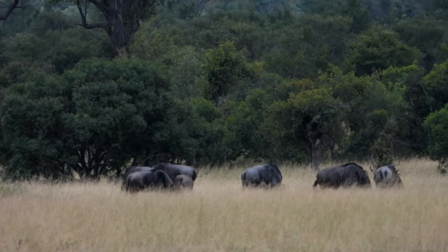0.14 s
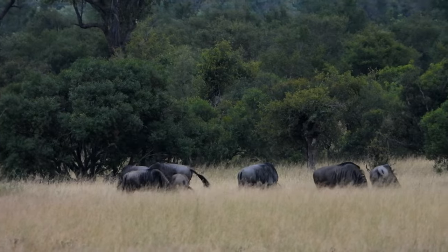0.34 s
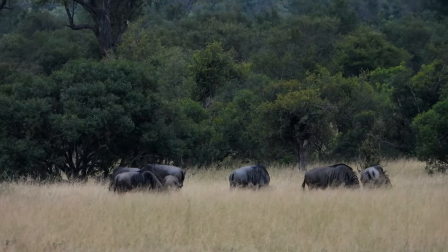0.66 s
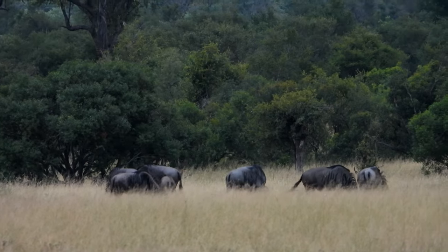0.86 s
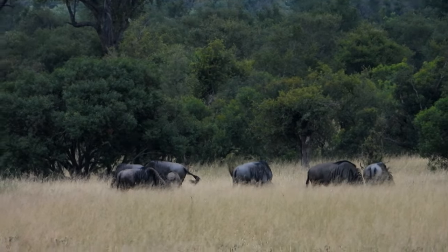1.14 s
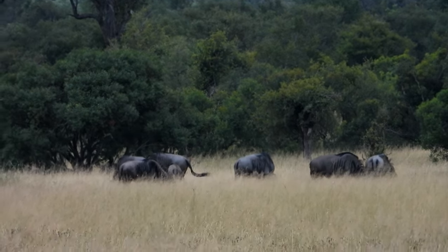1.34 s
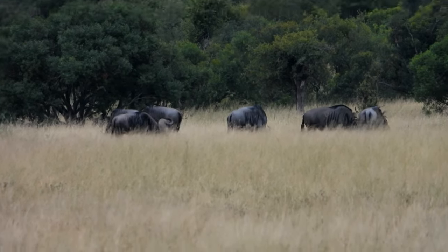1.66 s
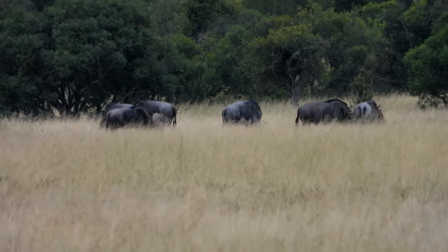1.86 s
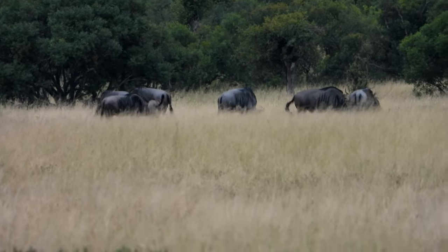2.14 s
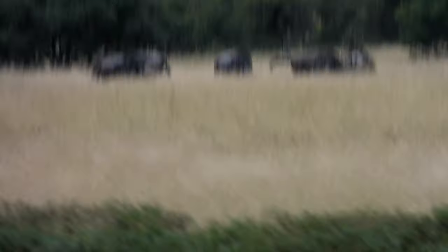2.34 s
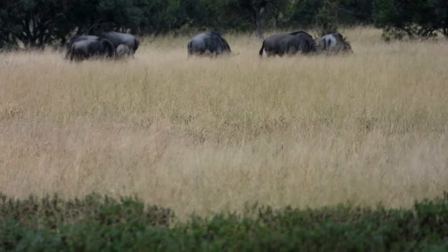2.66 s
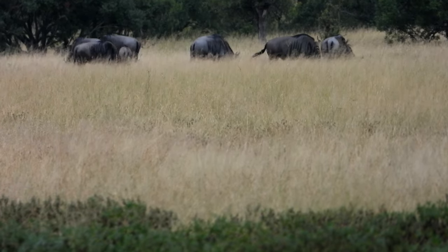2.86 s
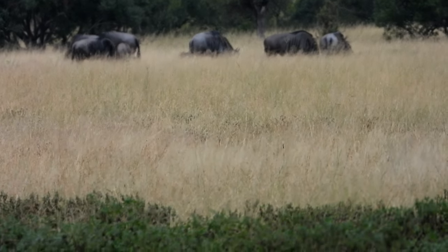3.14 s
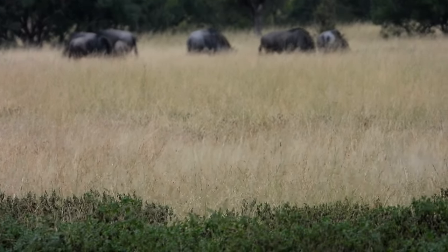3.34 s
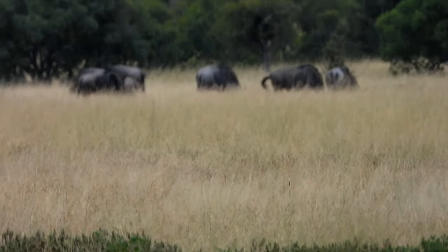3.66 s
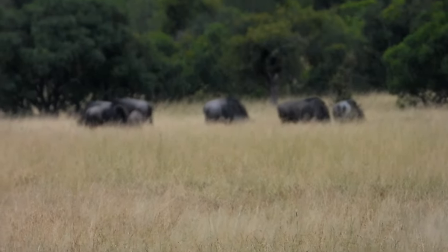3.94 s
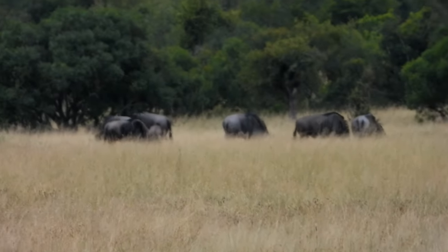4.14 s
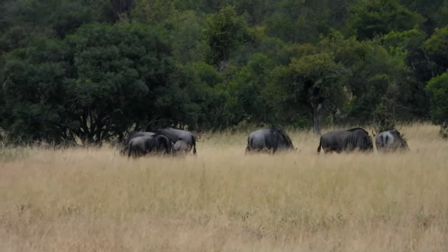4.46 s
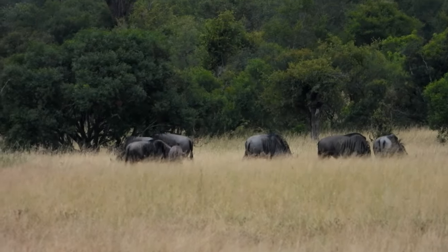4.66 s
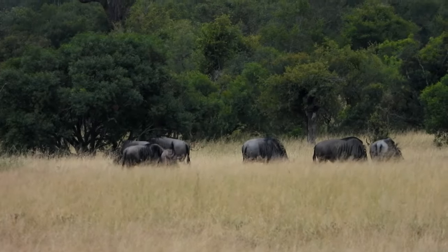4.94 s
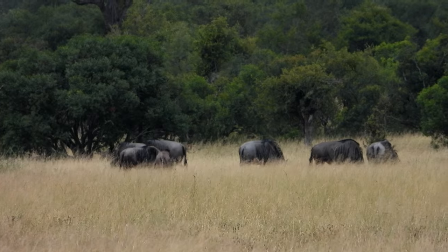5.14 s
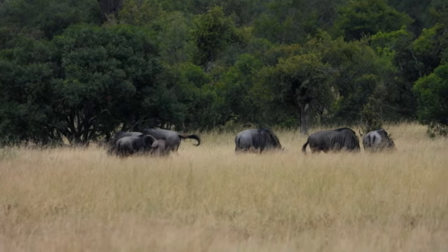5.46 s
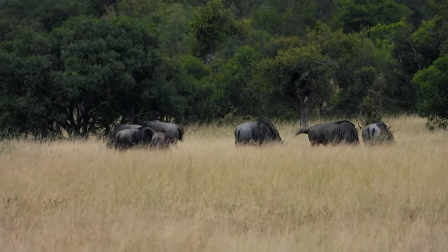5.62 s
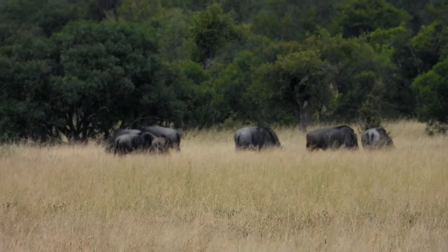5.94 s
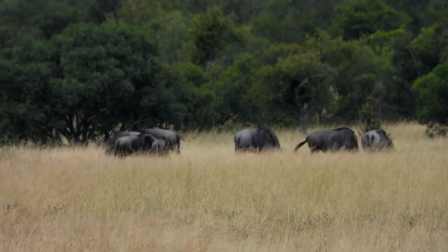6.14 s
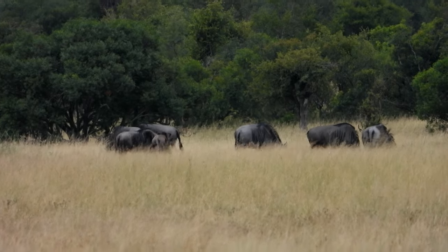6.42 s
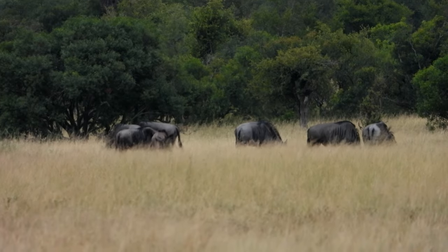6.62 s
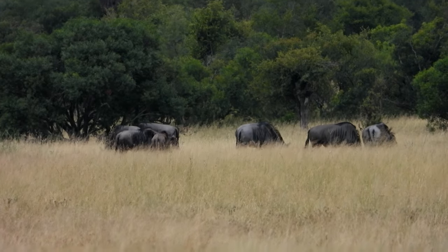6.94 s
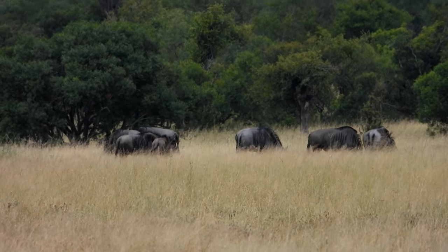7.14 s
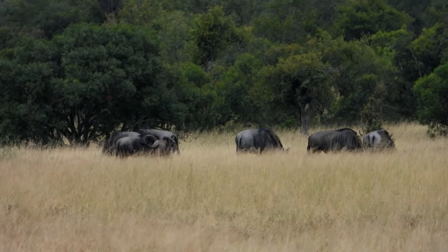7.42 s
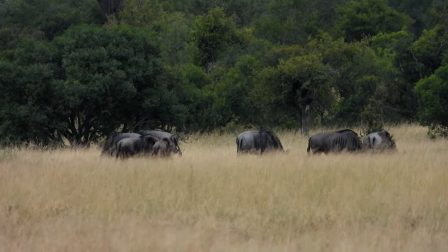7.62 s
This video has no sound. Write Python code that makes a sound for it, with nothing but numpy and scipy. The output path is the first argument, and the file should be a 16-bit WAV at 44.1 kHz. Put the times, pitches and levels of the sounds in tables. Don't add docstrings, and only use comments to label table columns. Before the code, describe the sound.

Close raspy bird squawks and scooping whistles repeat in alternating phrases, echoing off trees, while distant birds trill and an idling engine hums low.

```python
import sys
import numpy as np
from scipy import signal
from scipy.fft import rfft, irfft, next_fast_len
from scipy.io import wavfile
from scipy.ndimage import uniform_filter1d

SR = 44100
rng = np.random.default_rng(int(sys.argv[2]) if len(sys.argv) > 2 else 0)


def dump(signal):
    limited = np.clip(np.atleast_2d(signal).T, -1, 1)
    pcm = np.round(limited * 32767).astype(np.int16)
    wavfile.write(sys.argv[1], SR, pcm)


def volts_from_db(level):
    exponent = np.asarray(level, float) / 20
    return 10 ** exponent


N = 343539


def evened(x):
    return x / np.sqrt(np.mean(x ** 2) + 1e-20)


def read(points, hz):
    f, value = np.transpose(points)
    return np.interp(np.log(hz + 1), np.log(f + 1), value)


def add(mix, s, sound):
    part = mix[round(s * SR):][:len(sound)]
    part += sound[:len(part)]


def wander(count, hz):
    size = max(int(SR / hz), 2)
    noise = rng.standard_normal(count + 4 * size)
    smooth = uniform_filter1d(uniform_filter1d(noise, size), size)
    return evened(smooth[2 * size:][:count])


def resonate(x, hz, width):
    turn = np.exp(2j * np.pi * np.cumsum(hz * np.ones(len(x))) / SR)
    r = np.exp(-np.pi * width / SR)
    return 2 * (turn * signal.lfilter([1 - r], [1, -r], x / turn)).real


def swell(count, rise, fall):
    u = np.linspace(0, 1, count)
    return np.sin(np.pi / 2 * np.clip(np.minimum(u / rise, (1 - u) / fall), 0, 1)) ** 2


def shaped(rows, shape):
    return [(s, length, shape[0] * hz, hz, shape[1] * hz, db) for s, length, hz, db in rows]


def slid(rows):
    return [(s, length, hz0, (hz0 + hz1) / 2, hz1, db) for s, length, hz0, hz1, db in rows]


def note(row, strength, count, rise=.25, fall=.4, scoop=0., flutter_db=1.5, fade_db=0., flutter_hz=148.7):
    s, length, start, middle, end, db = row
    u = np.linspace(0, 1, int(length * SR))
    hz = start * (1 - u) * (1 - 2 * u) + 4 * middle * u * (1 - u) + end * u * (2 * u - 1)
    hz = hz * (1 - scoop * np.exp(-u / 0.0639))
    hz = hz * (1 + 0.0321 * u ** 3 * wander(len(u), 440))
    turns = np.cumsum(hz) / SR
    tone = 0
    for k in range(1, count + 1):
        partial_db = strength(k, k * hz) + fade_db * (k > 1) * u
        tone = tone + volts_from_db(partial_db) * np.sin(2 * np.pi * k * turns)
    level_db = db + flutter_db * wander(len(u), flutter_hz)
    return s, volts_from_db(level_db) * tone * swell(len(u), rise, fall)


def far_note(row):
    return note(row, lambda k, hz: 0, count=1, rise=0.13, fall=0.24, flutter_db=2.8, flutter_hz=240)


# (frequency [Hz], density [dB per Hz])
AIR_COLOUR = [(20, -22), (45, -8), (100, -3), (160, -5.5), (310, -22.5), (680, -20), (900, -12),
              (1500, -18.5), (2600, -24.5), (4600, -28), (5000, -36.5), (5600, -31.5), (7500, -40),
              (15500, -42)]
# (frequency [Hz], correlation [0..1])
LEFT_RIGHT_LIKENESS = [(60, .992), (200, .99), (550, .96), (1650, .93), (4970, .62), (8000, .45),
                       (15000, .45)]


def air():
    frames, hz = N // 256 + 5, np.fft.rfftfreq(1024, 1 / SR)
    a, b, c, d, patches = rng.standard_normal((frames, 513, 5)).T
    patches = evened(uniform_filter1d(uniform_filter1d(patches, 9, 0), 8, 1))
    same = np.clip(read(LEFT_RIGHT_LIKENESS, hz), -1, 1)[:, None]
    left = a + 1j * b
    right = same * left + np.sqrt(1 - same ** 2) * (c + 1j * d)
    spectra = np.array([left, right]) * volts_from_db(read(AIR_COLOUR, hz)[:, None] + 2.09 * patches)
    return volts_from_db(-33) * evened(signal.istft(spectra, nperseg=1024, noverlap=768)[1][:, :N])


# (order [multiple of firing rate], level [dB])
ENGINE_ORDERS = [(2, -51.5), (3, -44), (4, -37), (6, -36.5), (7, -42), (8, -62.5)]


def engine():
    firing_hz = 25.693
    turns = np.cumsum(firing_hz * (1 + 0.011863 * wander(N, 3.009))) / SR
    hum = np.zeros(N)
    for k, db in ENGINE_ORDERS:
        hum += volts_from_db(db - 0.5 + 2.46 * wander(N, 9.43)) * np.sin(2 * np.pi * (k * turns + rng.random()))
    return hum


def trill(s0, s1, hz, fall, rate, db):
    t = np.arange(int((s1 - s0) * SR)) / SR
    beat = (rate * t + .08 * wander(len(t), 30)) % 1
    turns = np.cumsum(hz + fall * (.5 - beat) + 60 * wander(len(t), 20)) / SR
    pulse = np.sin(np.pi * beat) ** 2.23 * volts_from_db(db + 1.97 * wander(len(t), 40))
    return s0, pulse * np.sin(2 * np.pi * turns) * signal.windows.tukey(len(t), .3)


# (pitch [Hz], fall in each note [Hz], rate [notes/s])
SINGERS = [(6650, 1300, 67), (6300, 800, 54), (4570, 900, 41)]
# (start [s], end [s], level [dB])
FAST_TRILLS = [
    (0, .15, -45),
    (.2, .6, -48),
    (.88, 1.7, -45),
    (5.78, 6.2, -46),
    (6.95, 7.72, -45),
]
# (start [s], end [s], level [dB])
EVEN_TRILLS = [
    (.3, .88, -42),
    (1.93, 2.36, -42),
    (2.68, 2.95, -52),
    (4.72, 5.08, -43),
    (6.13, 6.85, -43),
]
# (start [s], end [s], level [dB])
LOW_TRILLS = [
    (0, .25, -45),
    (.55, 1.2, -48),
    (6.05, 6.95, -52),
    (7.15, 7.5, -50),
]


def trills(out):
    for rows, singer in zip((FAST_TRILLS, EVEN_TRILLS, LOW_TRILLS), SINGERS):
        for s0, s1, db in rows:
            add(out, *trill(s0, s1, *singer, db))


# (time [s], pitch [Hz], level [dB])
TUMBLING_WHISTLES = [
    [(0.0, 1852, -34), (0.008, 1996, -31), (0.016, 1992, -29), (0.022, 1839, -34), (0.034, 1253, -28),
     (0.04, 1137, -29), (0.046, 1124, -36)],
    [(0.168, 1555, -41), (0.172, 1533, -33), (0.182, 1660, -31), (0.188, 1625, -30), (0.198, 1212, -28),
     (0.21, 1081, -30), (0.216, 1039, -38)],
    [(0.686, 1479, -37), (0.69, 1526, -34), (0.702, 2163, -31), (0.712, 2161, -24), (0.72, 1921, -31),
     (0.732, 1311, -24), (0.742, 1067, -28), (0.75, 952, -48)],
    [(1.297, 1519, -36), (1.303, 1625, -19), (1.309, 1708, -16), (1.319, 2180, -27), (1.325, 2144, -22),
     (1.335, 1902, -28), (1.347, 1342, -17), (1.362, 1147, -33)],
    [(1.688, 1739, -29), (1.696, 1748, -13), (1.704, 1765, -11), (1.71, 1991, -19), (1.714, 2025, -34),
     (1.726, 1506, -11), (1.74, 1321, -19), (1.748, 1381, -31)],
]


def tumbles(out):
    for curve in TUMBLING_WHISTLES:
        s, hz, db = np.transpose(curve)
        t = np.arange(s[0], s[-1], 1 / SR)
        pitch = uniform_filter1d(np.interp(t, s, hz), size=130) * (1 + .012 * wander(len(t), 400))
        turns = np.cumsum(pitch) / SR
        tone = 0
        for k, partial_db in enumerate((3, -15, -22)):
            lift_db = 8.0 * k * np.log2(pitch / 2100)
            tone = tone + volts_from_db(partial_db + lift_db) * np.sin(2 * np.pi * (k + 1) * turns)
        add(out, s[0], volts_from_db(np.interp(t, s, db) + 0.3) * tone * swell(len(t), .08, .1))


# (time [s], length [s], start pitch [Hz], end pitch [Hz], level [dB])
FAR_SLIDES = [(.115, 0.08, 2750, 3450, -42), (.105, .03, 2650, 2600, -40), (.2, .08, 2950, 2850, -48),
              (.465, .06, 2650, 2950, -46), (.755, .035, 2650, 2850, -45), (.012, .018, 4050, 3600, -41),
              (.42, 0.022, 3550, 3000, -39), (.026, .025, 2900, 2600, -42), (.225, .02, 1250, 1150, -36),
              (.05, .022, 1450, 1200, -38), (.605, .035, 1709, 1650, -41), (.61, 0.019, 4920, 4140, -41),
              (.873, .024, 3450, 2900, -39), (.873, .022, 2100, 1700, -34), (.908, .02, 3050, 2550, -37),
              (.912, 0.03, 3850, 2700, -36), (6.44, .035, 1650, 2750, -35.5),
              (6.455, .018, 3100, 3100, -36), (6.618, .018, 2900, 2500, -35),
              (6.745, .022, 2850, 2400, -38), (6.553, .02, 2950, 2500, -36), (6.62, .018, 2700, 4100, -34),
              (6.686, 0.018, 2830, 2480, -35.5), (6.915, 0.033, 1812, 1580, -39.5),
              (7.17, 0.034, 2735, 1700, -39), (7.195, .014, 3200, 3300, -37),
              (7.208, .016, 3200, 1500, -36), (7.232, .018, 1800, 1450, -35),
              (7.245, 0.02, 1700, 2000, -36), (7.262, 0.036, 2033, 1294, -32.5),
              (7.272, 0.033, 3500, 2300, -37.5), (7.305, .042, 2193, 1730, -31.5)]
# (time [s], length [s], start pitch [Hz], end pitch [Hz], level [dB])
GRACE_NOTES = [(2.92, .024, 3050, 3350, -31), (2.94, .036, 2820, 2380, -21),
               (2.93, 0.028, 3800, 3200, -29.5), (2.33, .014, 1900, 3100, -37),
               (5.066, .03, 1950, 3050, -25), (5.074, .024, 1200, 1700, -20), (5.15, .035, 1450, 1750, -24),
               (4.362, .012, 1200, 1600, -24), (2.98, .012, 1150, 1500, -25),
               (3.505, .014, 2450, 2850, -27), (3.516, .03, 2880, 2620, -19), (4.22, .03, 2820, 2600, -21),
               (3.511, 0.0239, 3630, 2700, -32.5), (4.231, 0.024, 3445, 2700, -29),
               (5.1, 0.0416, 2419, 2530, -16)]
# (time [s], length [s], pitch [Hz], level [dB])
ARCHED = [(.243, .032, 3820, -42), (.52, .037, 3830, -39.5), (.793, .065, 3782, -40),
          (1.42, 0.057, 3740, -42.5), (1.8, 0.037, 3780, -37.5), (2.16, 0.0316, 3977, -43.5),
          (6.438, 0.016, 3200, -40), (1.035, 0.063, 890, -35.5), (2.75, 0.0737, 869.6, -39.5),
          (3.65, 0.0584, 881.6, -32.5), (4.965, 0.075, 897.7, -33), (6.25, 0.0325, 852, -40)]
# (time [s], length [s], pitch [Hz], level [dB])
DIPPING = [
    (6.375, .07, 1670, -33.5),
    (4.18, 0.053, 2116, -42),
    (6.375, 0.084, 2880, -37.5),
    (6.475, 0.0412, 2786, -36),
    (6.915, 0.029, 2430, -37),
]
# (time [s], length [s], pitch [Hz], level [dB])
DROPPING = [
    (6.308, .06, 4080, -41),
    (6.308, .062, 2040, -38),
]
ARCH_BEND = (.975, 0.96)
DIP_BEND = (1.13, 1.01)
DROP_BEND = (.9, .72)


def far_whistles(out):
    rows = shaped(ARCHED, ARCH_BEND) + shaped(DIPPING, DIP_BEND) + shaped(DROPPING, DROP_BEND)
    for row in rows + slid(FAR_SLIDES + GRACE_NOTES):
        add(out, *far_note(row))


# (frequency [Hz], t60 [s])
TREE_DECAY = [(500, 0.885), (2300, 0.807), (5000, 0.816), (12000, 0.487)]


def treeline(x):
    taps = np.zeros((2, SR))
    at = np.arange(500, SR - 20, 20) + rng.integers(0, 20, (2, (SR - 501) // 20))
    np.put_along_axis(taps, at, rng.choice([-1., 1.], at.shape), 1)
    taps[1] = 1.65 * taps[0] + .5 * taps[1]
    hz, t, z = signal.stft(taps, SR, nperseg=256)
    tail = signal.istft(z * volts_from_db(-60 * t / read(TREE_DECAY, hz)[:, None]), SR, nperseg=256)[1]
    tail /= np.linalg.norm(tail, axis=1)[:, None]
    tail[:, round(.122 * SR)] += .3
    return signal.fftconvolve(x[None], tail, axes=1)[:, :N]


# (frequency [Hz], level [dB])
CALL_COLOUR = [(5900, 0), (6600, -5.5), (7100, -10), (9500, -3.5), (13000, -4)]


def coloured(x):
    size = next_fast_len(N)
    gain = volts_from_db(read(CALL_COLOUR, np.fft.rfftfreq(size, 1 / SR)))
    return irfft(rfft(x, size) * gain, size)[:N]


# (first [s], last [s], level [dB])
PIP_RUNS = [
    (.3, .31, -37),
    (.365, .67, -35.5),
    (.772, 1.25, -34),
    (1.531, 1.54, -36),
    (6.999, 7.36, -33.5),
]


def pips(out):
    for s0, s1, db in PIP_RUNS:
        for s in np.arange(s0, s1, .0586):
            add(out, *far_note((s - .003, .013, 2520, 2370, 2200, db - 3)))


# (time [s], level [dB])
CHIRP_PAIRS = [
    (.305, -47),
    (.502, -48.5),
    (.7, -42.5),
    (.9, -44),
    (1.28, -46.5),
    (7.18, -44),
    (7.38, -47),
    (7.58, -45.5),
]
# (time [s], level [dB])
SINGLE_CHIRPS = [
    (1.51, -49),
    (3.284, -35.5),
    (3.449, -34.5),
    (7.075, -45.5),
]


def chirps(out):
    for s, db in CHIRP_PAIRS + [(s + .071, db) for s, db in CHIRP_PAIRS] + SINGLE_CHIRPS:
        add(out, *far_note((s, .03, 6050, 5750, 5250, db)))


# (time [s],
# length [s], start pitch [Hz], end pitch [Hz], level [dB])
FALLING_WHISTLES = [(.747, 0.0253, 1618, 1140, -26.5), (.85, .045, 1660, 1139, -13),
                    (.972, 0.0351, 1640, 1380, -29.5), (1.75, .022, 1620, 1700, -20),
                    (2.339, 0.06015, 1848, 1506, -3.5), (2.465, 0.048, 1860, 1630, -20),
                    (2.986, .062, 1911, 1440, -5.5), (3.108, .046, 1860, 1620, -24),
                    (3.673, .053, 1950, 1770, -7.5), (4.372, .045, 2010, 1780, -3.5),
                    (5.091, 0.0532, 1894, 1840, -7)]
# (time [s], length [s], pitch [Hz], level [dB])
UPWARD_FLICKS = [
    (5.093, .012, 1850, -10),
    (4.562, .016, 2016, -12),
    (2.511, .013, 1950, -14),
    (1.362, 0.0267, 1926, -26.5),
    (1.846, 0.0164, 1600, -25.5),
    (1.86, .019, 2020, -9.5),
    (3.173, .016, 2075, -8),
    (3.856, 0.00835, 2062, -8.5),
]
FLICK_BEND = .97, 1.005


def near_whistles(out):
    for row in slid(FALLING_WHISTLES) + shaped(UPWARD_FLICKS, FLICK_BEND):
        partials_db = [0, -16, -21 + row[-1] + 5]
        add(out, *note(row, lambda k, hz: partials_db[k - 1], count=3, rise=0.22, fall=0.404,
                       scoop=0.28, flutter_db=1, fade_db=-14))


SQUAWK_OVERTONES = (-34, -15, 2, -6.5, -11.5, -16, -17.5, -19, -20, -27, -32, -36, -33, -36)
# (frequency [Hz], width [Hz], level [dB])
BEAK_RESONANCES = [(3750, 420, -3), (5300, 450, -7)]


def squawk(s, length, hz, db, sag, change_db, shake, fourth_db, rise):
    u = np.linspace(0, 1, int(1.18 * length * SR))
    count = len(u)
    beat = 2 * np.pi * (np.cumsum(200 * (1 + 0.2 * wander(count, 99.61))) / SR + rng.random())
    throat = hz * (1 + sag * (.5 - u))
    depth = shake * (1 + .3 * wander(count, 30))
    membrane = np.sin(beat) + 0.33 * wander(count, 602) + .3 * wander(count, 50)
    turns = np.cumsum(throat / 3 * (1 + depth * membrane)) / SR
    dull_db = 0.09 * min(db + 12.5, 0)
    voice = np.zeros(count)
    for k, part_db in enumerate(SQUAWK_OVERTONES):
        partial_db = part_db + dull_db * abs(k - 2) + fourth_db * (k == 3)
        voice += volts_from_db(partial_db) * np.sin(2 * np.pi * ((k + 1) * turns + rng.random()))
    voice = voice + sum(volts_from_db(lift_db) * resonate(voice, f, width) for f, width, lift_db in BEAK_RESONANCES)
    breath = resonate(rng.standard_normal(count), 1.1 * throat, 0.486 * hz)
    breath = resonate(breath, 1.1 * throat, 0.51 * hz)
    level_db = db + change_db * (2 * u - 1) + 1.21 * wander(count, 58.8) - 2.3 * np.cos(beat)
    sound = evened(voice) + 0.3 * evened(breath)
    return s - .007, volts_from_db(level_db) * sound * swell(count, rise / length, 0.027 / length)


# (time [s], length [s], throat [Hz], level [dB])
FADING_SQUAWKS = [(.894, 0.042, 1403, -31), (1.375, 0.0352, 1587, -24), (1.87, 0.0572, 2073, -12.5),
                  (2.548, 0.0693, 2212, -14), (3.18, 0.0622, 2120, -12), (3.24, 0.0495, 2160, -15.5),
                  (3.899, 0.0716, 2410, -11.5), (4.607, 0.0745, 2390, -9.5), (4.91, 0.043, 2690, -29.5),
                  (5.282, 0.1151, 2300, -11), (5.487, 0.1004, 2200, -16)]
# (time [s], length [s], throat [Hz], level [dB])
PARTNER_CALLS = [
    (1.103, 0.0526, 3250, -33.5),
    (1.555, 0.0637, 3150, -29),
    (2.0, 0.095, 2961, -28),
    (2.43, 0.099, 3250, -17),
    (3.0, .11, 3280, -16.5),
    (3.614, 0.1138, 3280, -15),
    (4.319, 0.1129, 3300, -14.5),
]
# (time [s], length [s], throat [Hz], level [dB])
SAGGING_SQUAWKS = [
    (1.754, 0.0559, 1650, -17.5),
    (1.93, 0.0383, 1800, -22.5),
    (3.7, 0.0525, 1800, -13),
    (4.401, 0.0586, 1910, -12),
]
# (time [s], length [s], throat [Hz], level [dB])
CACKLE_CALLS = [
    (5.086, .08, 1890, -14.5),
    (2.359, 0.045, 1850, -15),
]
# (time [s], length [s], throat [Hz], level [dB])
RISING_SQUAWKS = [
    (2.406, .058, 1750, -11.5),
    (3.061, .056, 1750, -16),
    (3.754, .06, 1850, -13),
    (4.456, .062, 1900, -12),
    (5.172, 0.0609, 1850, -13),
]
# (time [s], length [s], throat [Hz], level [dB])
CHATTER_CALLS = [
    (6.611, 0.0325, 3440, -28.5),
    (6.667, 0.0312, 3450, -30.5),
    (6.719, 0.0405, 2990, -32.5),
    (6.775, 0.043, 3240, -30.5),
    (6.858, 0.0412, 3330, -31),
]
# (time [s], length [s], throat [Hz], level [dB])
DISTANT_RASPS = [
    (7.379, .25, 2236, -36.5),
    (7.72, 0.0784, 2194, -35.5),
    (7.37, .26, 3400, -45),
    (7.3, .04, 1950, -37),
]
# (throat sag [share], level change [dB], pitch shake [share], fourth overtone [dB], rise [s])
FADE_MOTION = (0.03, -3.1, .115, 1.5, .019)
RASP_MOTION = (0.09, -0.43, .125, 1.5, .022)
SAG_MOTION = (.1, -1.2, .105, 2, .02)
CACKLE_MOTION = (.06, -2.5, .055, 5, .016)
RISE_MOTION = (-.36, 4.0, .08, 6, .028)
CHATTER_MOTION = (.09, -1.6, .12, 0.5, .018)
FAR_RASP_MOTION = (0.0344, 6.8, .125, 1.5, .03)


def squawks(out):
    kinds = [(RISING_SQUAWKS, RISE_MOTION), (CACKLE_CALLS, CACKLE_MOTION), (SAGGING_SQUAWKS, SAG_MOTION),
             (FADING_SQUAWKS, FADE_MOTION), (PARTNER_CALLS, RASP_MOTION), (CHATTER_CALLS, CHATTER_MOTION),
             (DISTANT_RASPS, FAR_RASP_MOTION)]
    for rows, motion in kinds:
        for row in rows:
            add(out, *squawk(*row, *motion))


# (time [s], level [dB], ring [Hz], t60 [s])
BODY_KNOCKS = [(1.09, -30.5, 321, .1), (1.413, -11, 101.8, 0.12), (1.425, -24.5, 899.6, 0.051),
               (1.445, -13.5, 95.7, 0.128), (1.494, -12.5, 1877, 0.0272), (1.496, -18, 309, 0.0585),
               (1.497, -25, 521, 0.051), (1.5, -14, 118.8, 0.073), (1.506, -19, 896, 0.0287),
               (1.525, -12.5, 60, 0.138), (1.414, -23, 280, .06), (2.18, -27, 65, .15), (2.33, -24, 60, .2),
               (6.24, -33, 310, .1), (6.192, -33, 1100, .02), (3.54, -22.5, 70.3, 0.178),
               (6.422, -19.5, 106.4, 0.19)]


def bumps():
    out, t = np.zeros(N), np.arange(SR // 5) / SR
    for s, db, hz, t60 in BODY_KNOCKS:
        onset = np.minimum(t * hz, 1)
        add(out, s, volts_from_db(db - 60 * t / t60) * np.sin(2 * np.pi * hz * t) * onset)
    return out


# (time [s], length [s], pitch [Hz], level [dB])
GENTLE_NOTES = [
    (2.024, .062, 712, -23),
    (3.52, 0.03, 1383, -22),
    (3.537, 0.0465, 1235, -15.5),
    (4.242, 0.0402, 1252, -14),
    (4.278, 0.052, 1356, -21),
    (3.574, .036, 1390, -25),
]
# (time [s], length [s], pitch [Hz], level [dB])
STEEP_NOTES = [
    (2.492, .035, 1080, -12),
    (2.963, 0.044, 1160, -15),
    (3.588, 0.04, 1190, -14),
    (4.316, 0.03, 1130, -12),
]
GENTLE_BEND = (1.02, 0.965)
STEEP_BEND = (1.07, 0.89)
# (frequency [Hz], overtone level [dB])
PARTNER_OVERTONES = [(1200, -36), (2500, -5), (2900, 0.5), (3600, -3), (4200, -21.5), (5000, -17),
                     (6250, -17.5), (7500, -21.5), (12000, -44.5)]


def partner_notes(out):
    for row in shaped(STEEP_NOTES, STEEP_BEND) + shaped(GENTLE_NOTES, GENTLE_BEND):
        add(out, *note(row, lambda k, hz: read(PARTNER_OVERTONES, hz), count=9, rise=0.35, fall=0.16))


# (time [s], level [dB])
HAND_RUB = [
    (2.1, -47),
    (2.28, -46.5),
    (2.371, -29.5),
    (2.45, -35.5),
    (2.56, -45.5),
]


def rub():
    s, db = np.transpose(HAND_RUB)
    t, out = np.arange(s[0], s[-1], 1 / SR), np.zeros(N)
    noise = resonate(resonate(rng.standard_normal(len(t)), 80, 900), 80, 900)
    level_db = np.interp(t, s, db) + 3.5 * wander(len(t), 34)
    add(out, s[0], volts_from_db(level_db) * evened(noise))
    return out


# (time [s], length [s], start pitch [Hz], end pitch [Hz], level [dB])
CLEAR_STRANDS = [
    (2.424, .03, 2050, 2300, -15),
    (3.078, .03, 1850, 2150, -18),
    (3.768, .034, 2520, 2200, -13),
    (4.47, .04, 2520, 2620, -13),
    (5.186, .038, 2250, 2620, -13),
    (5.284, .022, 2700, 2800, -15),
    (5.555, .03, 2550, 2700, -19),
]


def clear_strands(out):
    for row in slid(CLEAR_STRANDS):
        add(out, *note(row, lambda k, hz: 0, count=1, rise=.25, fall=.3, flutter_db=3, flutter_hz=260))


# (time [s], length [s], pitch [Hz], level [dB])
BUZZY_NOTES = [
    (2.515, 0.04, 746, -8),
    (3.862, 0.0563, 766.1, -5.5),
    (4.572, 0.0479, 775.6, -6.5),
    (3.182, .022, 745, -13),
]
BUZZ_BEND = 0.98, 1.008
# (frequency [Hz], overtone level [dB])
NEAR_OVERTONES = [(700, -29.5), (1530, -19), (2300, 1.5), (3060, -10), (3830, -12), (4600, -21),
                  (5360, -16), (6900, -43), (12000, -52)]


def buzzes(out):
    for row in shaped(BUZZY_NOTES, BUZZ_BEND):
        add(out, *note(row, lambda k, hz: read(NEAR_OVERTONES, hz), count=14, rise=0.11, fall=0.313))


# (time [s], length [s], pitch [Hz], level [dB])
HOOKED = [
    (6.665, 0.031, 2153, -31.5),
    (6.72, .035, 1783, -34),
    (6.785, 0.0398, 2403, -32.5),
    (6.865, 0.042, 2750, -30),
]
HOOK_BEND = (0.74, 0.968)


def hooks(out):
    for row in shaped(HOOKED, HOOK_BEND):
        add(out, *note(row, lambda k, hz: 0, count=1, rise=0.3, fall=0.3, flutter_db=4, flutter_hz=300))


def scene():
    far, duet = np.zeros(N), np.zeros(N)
    for voice in (trills, far_whistles, pips, chirps, hooks):
        voice(far)
    for voice in (tumbles, near_whistles, squawks, partner_notes, clear_strands, buzzes):
        voice(duet)
    near = coloured(duet)
    echoes = treeline(volts_from_db(-12.5) * near + volts_from_db(-9.5) * far)
    return near + far + echoes + air() + engine() + bumps() + rub()


def low_pass(x):
    return signal.sosfilt(signal.butter(12, 15680, fs=SR, output="sos"), x)


def record(dry):
    ports = np.array([dry[0], np.roll(dry[1], 1)])
    ports = signal.sosfilt(signal.butter(3, 42, "high", fs=SR, output="sos"), ports)
    power_db = 10 * np.log10(abs(uniform_filter1d((ports ** 2).mean(0), 900)) + 1e-12)
    fall = np.arange(N) * 5.12 / SR
    held_db = np.maximum.accumulate(power_db + fall) - fall
    over_db = np.maximum(held_db + 17.0, 0)
    ducked = ports * volts_from_db(3 - 0.3406 * uniform_filter1d(over_db, 2000))
    limited = ducked / np.sqrt(np.sqrt(1 + .5 * (ducked * ducked) ** 2))
    lowpass = signal.firwin(511, 15750, window=("kaiser", 9), fs=SR)
    mix = signal.oaconvolve(limited, lowpass[None], "same")
    return low_pass(mix)


dry = scene()
out = record(dry)
dump(out)
```